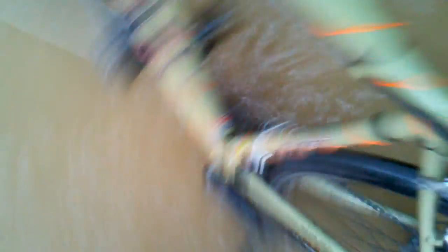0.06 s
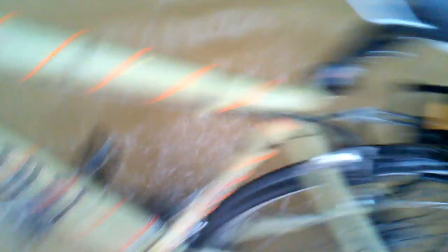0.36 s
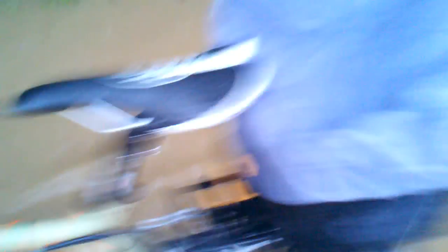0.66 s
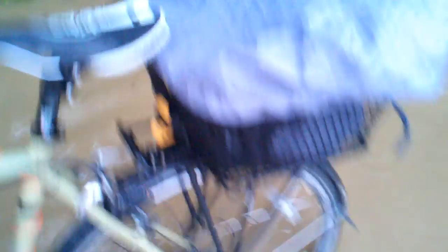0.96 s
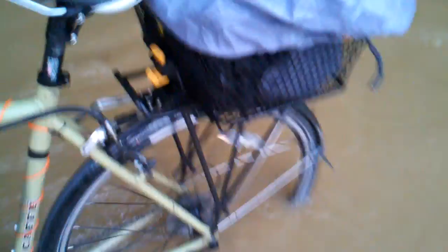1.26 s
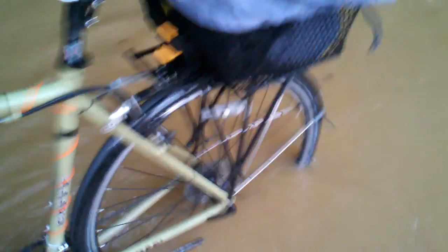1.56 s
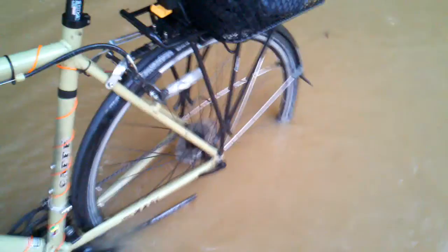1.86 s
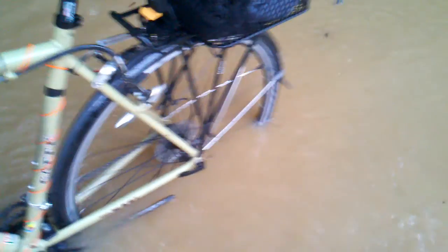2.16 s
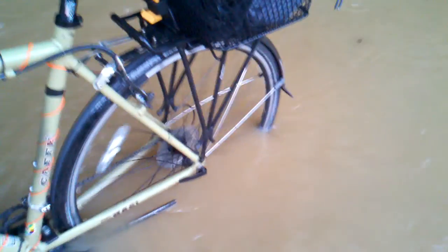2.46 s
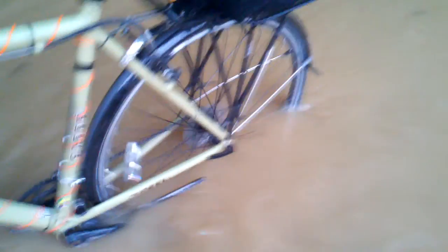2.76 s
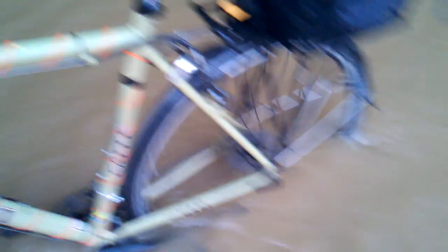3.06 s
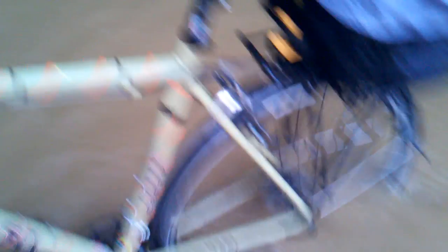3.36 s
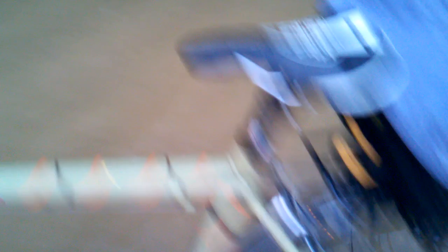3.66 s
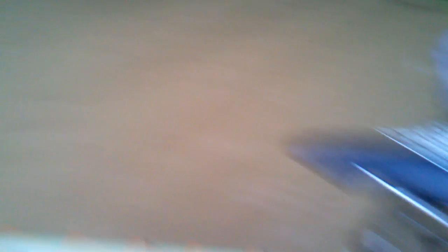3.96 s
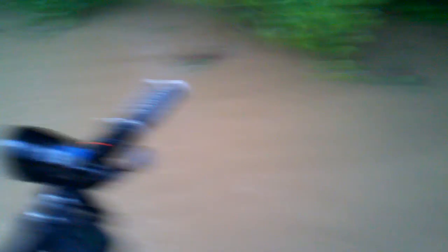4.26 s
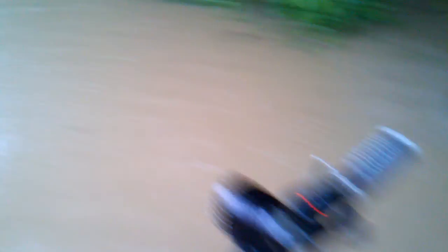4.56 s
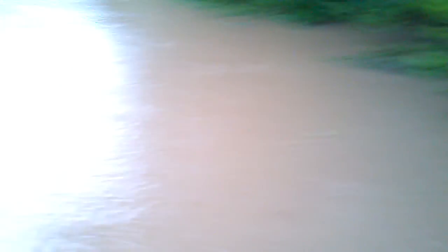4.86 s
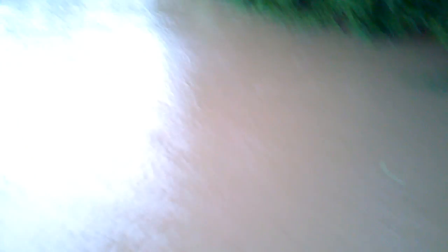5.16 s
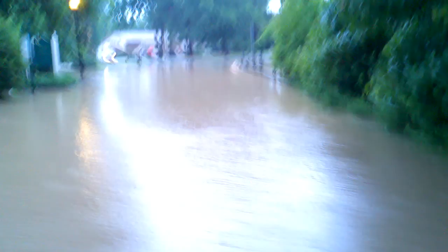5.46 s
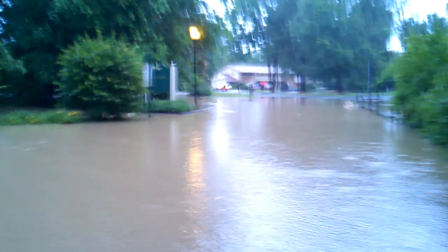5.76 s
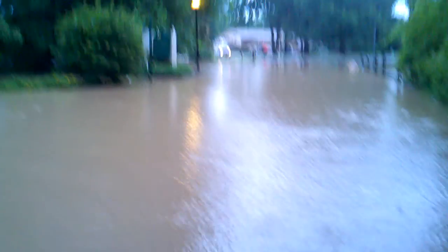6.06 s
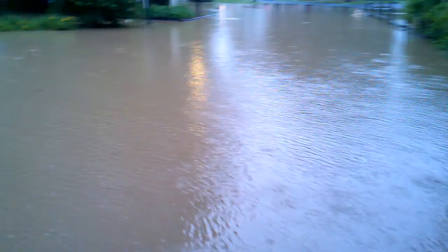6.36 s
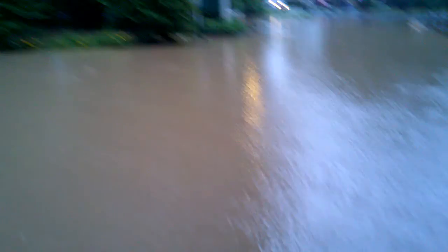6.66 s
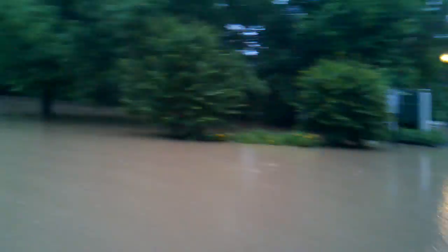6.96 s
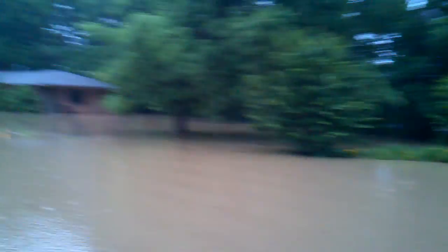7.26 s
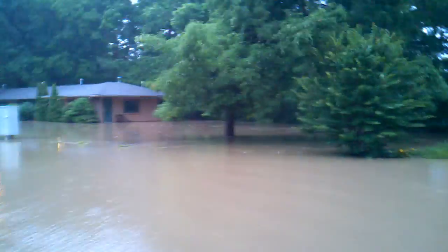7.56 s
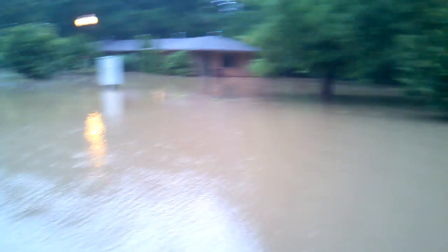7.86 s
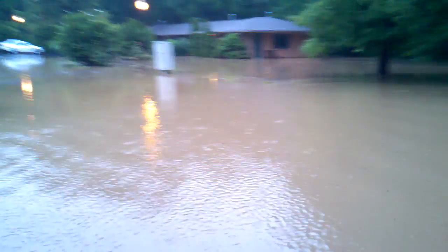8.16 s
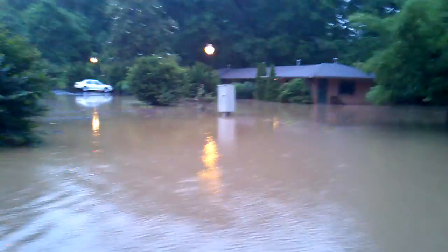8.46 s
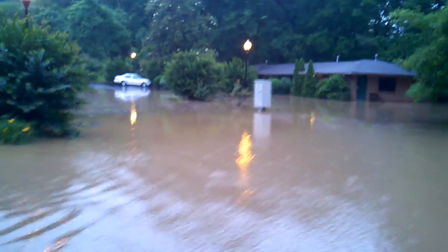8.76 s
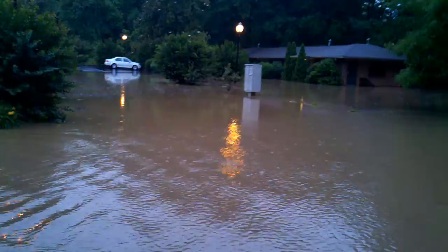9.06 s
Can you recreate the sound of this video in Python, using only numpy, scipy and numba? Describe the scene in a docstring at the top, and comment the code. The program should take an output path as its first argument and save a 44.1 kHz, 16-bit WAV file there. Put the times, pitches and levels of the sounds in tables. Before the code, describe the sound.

Water sloshes and plops around the legs of a person wading through a flooded street, with a light trickle from a bicycle wheel. The strides build into heavier, foamy splashing and gulping gurgles, then settle to gentler laps as distant birds whistle and a faint engine-like hum swells and fades. The flood washes and rumbles quietly throughout, and a few soft bumps touch the close, hand-held stereo microphone.

```python
"""A flooded street, where someone wades beside a bicycle, close to a hand-held stereo microphone.
Each stride pushes up a slosh of ringing bubbles, foam, deep gurgles and spray, biggest midway through.
Single plops, gulping air pockets, ticks and jets of droplets sit on top; water trickles off the wheel.
Behind lie the wash of the flood, a low rumble, a faint engine-like drone and a few far birds.
Soft buffets bump one microphone port, and the two ports are cross-fed to widen the image."""
import sys
import numpy as np
from scipy import signal
from scipy.fft import rfft, irfft, next_fast_len
from scipy.io import wavfile
from scipy.ndimage import uniform_filter1d
from numba import njit

SR = 44100
rng = np.random.default_rng(int(sys.argv[2]) if len(sys.argv) > 2 else 0)


def dump(signal):
    """Clip the signal to [-1, 1] and save it as 16-bit WAV at the path in sys.argv[1]."""
    limited = np.clip(np.atleast_2d(signal).T, -1, 1)
    pcm = np.round(limited * 32767).astype(np.int16)
    wavfile.write(sys.argv[1], SR, pcm)


N = 410122

# Strides through the water. Each row: start, swell and hold in seconds, then slosh, gurgle and spray in dB.
STRIDE_SURGES = [(0, 0.0031, 0.035, -40, -40, -56), (0.235, 0.11, 0.57, -37, -39.5, -47.5),
                 (0.992, 0.048, 0.12, -35, -49, -49), (1.31, 0.051, 0.21, -32.5, -41.5, -42.5),
                 (1.845, 0.16, 0.24, -41.5, -49, -49), (2.897, 0.053, 0.21, -41.5, -56, -51),
                 (3.196, 0.1, 0.23, -43.5, -46.5, -51), (3.59, 0.23, 0.48, -31.5, -38, -41),
                 (3.997, 0.036, 0.2, -28.5, -38, -35.5), (4.308, 0.14, 0.18, -26.5, -34.5, -39.5),
                 (4.541, 0.12, 0.25, -26, -35.5, -33), (4.926, 0.054, 0.48, -25.5, -30.5, -35.5),
                 (5.486, 0.02, 0.61, -27, -32.5, -40), (5.79, 0.096, 0.062, -30, -47, -33.5),
                 (6.336, 0.26, 0.14, -28.5, -32, -41), (7.182, 0.069, 0.24, -35, -38, -47.5),
                 (8.015, 0.2, 0.028, -36, -50, -54.5), (8.36, 0.057, 0.21, -48, -46.5, -58.5)]
# Crests that break. Each row: peak time in seconds, slosh in dB, spray in dB.
CRESTS = [(0.018, -48, -43), (.35, -33.5, -59), (.52, -35, -49), (0.779, -34, -50), (1.26, -27, -40.5),
          (1.42, -43, -47), (1.55, -48, -59), (2.11, -31.5, -58), (2.4, -42, -62), (2.85, -44, -49),
          (2.93, -35, -45.5), (4.027, -26.5, -30.5), (4.649, -25, -30), (4.70, -23.5, -36),
          (5.28, -20.5, -35), (5.335, -37, -32.5), (5.39, -27, -29.5), (5.53, -21.5, -50),
          (5.917, -21, -37), (5.97, -20, -35), (6.15, -28, -45), (6.39, -34.5, -47), (7.5, -48, -44.5),
          (8.26, -34, -53)]
# Air dragged under. Each row: centre time in seconds, length in seconds, level in dB.
TRAPPED_AIR = [(0.752, 0.053, -29), (1.53, 0.033, -24), (2.284, 0.02, -33), (3.088, 0.17, -37.5),
               (4.128, 0.049, -23.5), (4.378, 0.13, -26.5), (5.126, 0.76, -27.5), (5.746, 0.35, -23),
               (5.96, 0.11, -27), (6.41, 0.078, -32.5), (6.743, 0.041, -42), (8.295, 0.16, -37.5)]

# The tone colour of each layer. Each row: frequency in Hz, relative level in dB.
SLOSH_TONE = [(500, 1.5), (750, 5), (1300, 2), (1800, 0), (2300, -10), (2900, -12), (3800, -12.5)]  # midrange bubbles
FOAM_TONE = [(60, -59), (150, -7.5), (300, -6), (600, -8.5), (1400, 2.5), (1900, -1), (2600, -18.5),
             (3600, -32), (6000, -51), (14000, -55)]  # churned froth
GURGLE_TONE = [(170, -20), (230, -6.5), (300, -5), (420, 1), (540, -2.5)]  # big, deep bubbles
SPRAY_TONE = [(1500, -84), (2800, 5), (3800, 0.5), (5000, -1.5), (6500, 0.5), (8000, 3.5), (9500, 1),
              (11000, -2), (14000, -4)]  # fine droplets
FLOOD_TONE = [(30, -37), (100, -31), (250, -1), (450, 3), (700, -4), (1300, -2), (2300, -6.5), (3300, -8),
              (5200, -16), (8000, -12.5), (14000, -18.5)]  # water further off
RUMBLE_TONE = [(20, -4), (45, -27), (75, -8), (110, -1.5), (135, 4.5), (170, 2), (260, 2.5), (600, -20),
               (2000, -60)]  # the low end of the street

# Fader rides for the distant flood, the rumble and the drone. Each row: time in seconds, gain in dB.
FLOOD_FADER = [(0, -45.5), (4, -45.5), (7.8, -44.5), (8.7, -48), (9.3, -48)]
RUMBLE_FADER = [(0, -49.5), (4, -52.5), (6, -48.5), (7.2, -50), (8.6, -51.5), (9.3, -55.5)]
DRONE_FADER = [(0, -20), (5.8, -4), (6.7, 0.5), (7.3, 0), (8.4, -15), (9.3, -22.5)]
# The tones of the far drone. Each row: pitch in Hz, level before the fader in dB.
DRONE_TONES = [(109, -53), (167, -54.5), (219, -54), (276, -67)]

# Sharp ticks of spatter. Each row: start in seconds, level in dB, pitch in Hz, decay in seconds.
DROP_TICKS = [(.055, -22.5, 7640, 0.0033), (0.271, -26.5, 5000, 0.0036), (0.6462, -14.5, 9300, 0.001),
              (1.1343, -23, 5470, 0.0044), (1.2266, -20, 9100, 0.005), (1.502, -17, 11500, 0.00042),
              (1.512, -25, 11500, 0.0005), (1.659, -21, 3900, .003), (1.988, -24.5, 9100, 0.006),
              (2.229, -18, 4200, 0.0034), (2.273, -27, 4500, 0.0015), (2.428, -27.5, 8600, .002),
              (2.6807, -29, 4240, 0.002), (2.9168, -27, 6960, .002), (4.0238, -21, 3700, 0.0022),
              (4.3425, -17, 11000, 0.00062), (4.832, -13, 9100, 0.0026), (5.3652, -14.5, 9300, 0.0027),
              (7.225, -20.5, 3100, 0.0021), (8.492, -31, 5030, 0.0029)]
# Single plops. Each row: start in seconds, level in dB, pitch in Hz, swell in cycles, slap trim in dB.
PLOP_HITS = [(0.242, -18.5, 1220, 1.9, -9), (0.268, -21.5, 388, 1.9, -6), (0.364, -18, 1250, 2.4, -16),
             (.388, -26, 1500, 1.5, -8), (.527, -25.5, 1016, 4.5, -14), (.657, -17, 795, 0.99, -5),
             (.76, -24, 660, 3.2, -18), (0.785, -25, 1460, 4.8, -16), (.875, -21, 350, .5, -28),
             (1.016, -20, 1400, 2.2, -4), (1.029, -22, 1150, 3.5, -2.5), (1.098, -20, 1450, 2, -12),
             (1.127, -21.5, 1440, 3.5, -14), (1.155, -18, 770, 1.1, -18), (1.2, -20, 1500, 3.2, -2),
             (1.232, -14.5, 310, 1.07, -5), (1.315, -14.5, 880, 1.5, -19), (1.5123, -13.5, 283, 0.64, -18),
             (1.5135, -15, 617, 1.2, -12), (1.529, -17, 1540, 7, -6), (1.536, -16.5, 1260, 2, -10),
             (2.008, -24, 1450, 4.6, -14), (2.116, -23, 794, 2, -18), (2.2277, -26, 1200, 1.8, -10),
             (2.276, -24, 507, 1, -13), (2.753, -30.5, 1850, 2, -14), (2.849, -20.5, 1570, 2.2, -23),
             (2.859, -20, 1700, 4.9, -26), (2.9154, -13.5, 1120, 1.1, -20),
             (2.9252, -14.5, 680, 0.75, -3.5), (3.005, -27, 1140, 2.5, -10), (3.143, -26, 1610, 3.1, -9),
             (3.367, -32.5, 680, 2.8, -14), (3.392, -27, 1700, 2, -12), (3.432, -23.5, 1250, 7.2, -2),
             (3.52, -23, 1810, 3, -6), (3.562, -28, 1600, 5.7, -14), (3.63, -27.5, 1160, 4.5, -2),
             (3.7185, -20.5, 700, .8, -9), (4.023, -11, 1310, 0.99, -6), (4.0283, -13.5, 900, 1.1, 0),
             (4.193, -10, 1510, 2.8, -4), (4.229, -3, 986, 1.2, -24), (4.347, -13, 360, 1, -21),
             (4.642, -11, 1830, 3.7, -11), (4.654, -11, 1750, 4.5, -17), (4.704, -10, 706, 2, -12),
             (4.7378, -8, 1630, 1.9, -17), (4.7413, -3.5, 1280, 0.5, -18), (4.834, -14, 1310, 2.8, -6),
             (5.259, -13.5, 570, 2.1, -12), (5.299, -12, 867, 3.7, -11), (5.334, -13.5, 1280, 2.6, -8),
             (5.388, -13, 1340, 2.4, -13), (5.51, -15, 1230, 3.5, -12), (5.5283, -7.5, 1070, 1.7, -10),
             (5.55, -9, 1320, 3.2, -14), (5.831, -22, 380, 0.72, 5), (5.8538, -10, 960, 0.96, -10),
             (6.418, -26, 443, 0.76, -1), (6.427, -18, 1120, 2.6, -9), (6.721, -19, 402, 1.8, -6),
             (6.836, -16.5, 500, 0.96, -1), (6.976, -21.5, 1290, 1.2, -7), (7.109, -19.5, 1030, 2.6, -11),
             (7.2717, -18.5, 930, 2.2, -15), (7.29, -16.5, 470, 1.5, -18), (7.452, -21, 537, 1.3, -12),
             (7.536, -16.5, 638, 2.4, -7), (7.684, -28, 325, 1.2, -18), (8.22, -19, 1260, 3.2, -11),
             (8.3392, -18, 673, 1.1, -12)]
# Jets of fine droplets. Each row: centre time in seconds, length in seconds, level in dB, pitch in Hz.
DROPLET_JETS = [(0.51, .025, -42, 7550), (0.718, 0.059, -35, 8400), (0.795, .05, -38, 8600),
                (0.813, 0.031, -34, 10700), (1.445, 0.053, -33, 12500), (1.591, 0.034, -38, 8500),
                (1.67, 0.026, -41, 7800), (2.159, 0.026, -35, 6900), (2.274, 0.022, -44, 7500),
                (2.36, .016, -51, 6200), (2.697, .012, -52, 7500), (2.95, .03, -45, 7940),
                (3.292, 0.035, -47, 6960)]
# Soft bumps on one port. Each row: start in seconds, level in dB, length in seconds.
PORT_BUFFETS = [(.74, -40, 0.079), (2.37, -49, 0.04), (3.17, -44, 0.034), (4.12, -46, 0.22),
                (4.86, -51, .04)]
# Air pockets closing. Each row: start and length in seconds, level in dB, first and last pitch in Hz.
GULP_GLIDES = [(0.822, 0.081, -25.5, 230.7, 590), (0.87, 0.051, -33, 568, 466),
               (0.893, 0.057, -37, 750, 1110), (1.235, .062, -31, 411, 475), (1.544, 0.029, -32, 845, 1750),
               (4.479, 0.032, -25, 304, 332), (4.521, 0.038, -24, 298, 360), (5.053, 0.034, -24, 289, 350),
               (5.139, 0.033, -24, 298, 363), (5.589, 0.032, -21.5, 253, 336), (5.7, 0.027, -23, 418, 762),
               (5.726, 0.068, -30, 448, 420), (7.237, 0.031, -35, 630, 860),
               (7.553, 0.031, -30.5, 1180, 1450)]
# Far birds. Each row: start and length in seconds, first and last pitch in Hz, level in dB.
BIRD_CALLS = [(1.69, 0.23, 3590, 3540, -47), (2.836, 0.2, 3540, 3590, -47.5),
              (6.352, 0.038, 2200, 2370, -40), (6.425, 0.12, 2400, 2360, -42),
              (6.857, 0.11, 3560, 3430, -38), (6.929, 0.062, 2990, 3050, -35),
              (7.066, 0.041, 2480, 2090, -40), (7.165, 0.09, 2520, 2350, -35.5),
              (7.333, 0.15, 3380, 3290, -46), (7.924, 0.1, 2160, 2080, -49), (8.313, 0.16, 3440, 3070, -48)]

# The hand shading the microphone. Each row: frequency in Hz, left port over right port in dB.
HAND_SHADE = [(100, -3), (300, 1.4), (600, 0.8), (1300, 0.5), (2000, -10.5), (2500, -12.5), (3300, -4),
              (4700, 0.5), (6500, -0.5), (14000, -0.3)]
# Cross-feed between the ports. Each row: frequency in Hz, share of the other port to subtract.
CROSS_FEED_SHARE = [(100, 0.88), (2600, 1), (4100, 0.61), (5200, 0.35), (8000, 0.2), (14000, 0.082)]
# Extra width in the upper mids. Each row: frequency in Hz, boost to the side signal in dB.
SIDE_BOOST = [(1300, 0), (1750, 3), (2300, 4), (3000, 0)]

TIME = np.arange(N) / SR
CONTROL_TIME = np.arange(N * 1000 // SR + 1) / 1000  # seconds, in millisecond steps for envelopes


def amp(db):
    """Decibels to gain."""
    return 10 ** (np.asarray(db) / 20)


def unit_rms(x):
    """Scales a signal to rms 1."""
    return x / np.sqrt(np.mean(x ** 2) + 1e-20)


def curve_at(curve, hz):
    """Reads a curve along a log-frequency axis."""
    knots_hz, values = np.transpose(curve)
    return np.interp(np.log(hz + 1), np.log(knots_hz + 1), values)


def fader(ride):
    """Turns a fader ride into a gain for every sample."""
    times, db = np.transpose(ride)
    return amp(np.interp(TIME, times, db))


def add(mix, start, sound):
    """Lays a sound into both ports, start seconds in."""
    part = mix[:, max(round(start * SR), 0):][:, :sound.shape[-1]]
    part += sound[..., :part.shape[1]]


def wash(tone, patchy_db, apart_hz):
    """Noise in flickering patches, narrow in the bass and opening out towards apart_hz."""
    hz = np.fft.rfftfreq(1024, 1 / SR)
    mid_re, mid_im, side_re, side_im, patches = rng.standard_normal((5, N // 256 + 5, len(hz)))
    patches = uniform_filter1d(patches, size=4, axis=0)  # smear over time
    patches = unit_rms(uniform_filter1d(patches, size=60, axis=1))  # and over frequency
    mid = mid_re + 1j * mid_im
    side = (side_re + 1j * side_im) * np.clip(hz / apart_hz, 0.14, 1)
    frames = np.array([mid + side, mid - side]) * amp(curve_at(tone, hz) + patchy_db * patches)
    _, noise = signal.istft(frames.transpose(0, 2, 1), nperseg=1024, noverlap=768)
    return unit_rms(noise[:, :N])


@njit
def ring(start, size, hz, swell, lag, rise):
    """Each bubble swells, dies away and rises in pitch, reaching the right port lag seconds later."""
    out = np.zeros((2, N))
    for k in range(len(start)):
        first = int(start[k] * SR)
        for i in range(max(-first, 0), min(int(8 * swell[k] * SR), N - first)):
            t = i / SR
            age = t / swell[k]
            envelope = size[k] * age * np.exp(1 - age)
            turns = hz[k] * t * (1 + rise * age)
            out[0, first + i] += envelope * np.sin(2 * np.pi * turns)
            out[1, first + i] += envelope * np.sin(2 * np.pi * (turns - hz[k] * lag[k]))
    return out


def bubbles(start, size, hz, cycles, rise, lag_ms=0.036, scatter_ms=0.089):
    """Bubbles scattered over the water, a little to the left; cycles sets how long each swells."""
    lag = (lag_ms + scatter_ms * rng.standard_normal(len(start))) / 1000
    swell = np.clip(cycles, 0.3, 12) / hz
    return ring(start, size, hz, swell, lag, rise)


def cloud(tone, count, cycles, spread_db, rise):
    """A steady cloud of bubbles, loud and soft, their pitches spread evenly over the octaves."""
    when, pitch, rank, sustain = rng.random((count, 4)).T
    low_hz, high_hz = tone[0][0], tone[-1][0]
    hz = low_hz * (high_hz / low_hz) ** pitch
    size = hz * amp(curve_at(tone, hz) - spread_db * np.log(rank + 0.045))
    return unit_rms(bubbles(when * N / SR, size, hz, cycles * (0.5 + sustain), rise))


def surge(start, swell, hold, fall_db_per_s):
    """An envelope that swells, holds and dies away: a gain for every millisecond."""
    t = CONTROL_TIME - start
    attack = np.clip(t / max(swell, 0.002), 0, 1)
    return attack * amp(-fall_db_per_s * np.maximum(t - swell - hold, 0))


def churning(wake_db=-9, hang_db=-8, spray_build_db=2.5):
    """How hard strides, crests and trapped air drive the slosh, gurgle and spray; their powers add."""
    slosh, gurgle, spray = np.zeros((3, len(CONTROL_TIME)))
    for start, swell, hold, slosh_db, gurgle_db, spray_db in STRIDE_SURGES:
        drive = surge(start, swell, hold, fall_db_per_s=62.5)
        wake = surge(start, swell, hold, fall_db_per_s=29)
        push = np.maximum(drive, amp(wake_db) * wake)  # the wake laps on more softly
        throw = np.maximum(drive, amp(hang_db) * wake)  # the last of the spray falls back
        progress = np.clip((CONTROL_TIME - start) / (swell + hold), 0, 1)
        build_db = -spray_build_db * (1 - progress)  # spray grows as the leg drives on
        slosh += (push * amp(slosh_db)) ** 2
        gurgle += (push * amp(gurgle_db)) ** 2
        spray += (throw * amp(spray_db + build_db)) ** 2
    rise_s = 0.026
    for peak, slosh_db, spray_db in CRESTS:
        crest = surge(peak - rise_s, rise_s, hold=0.0053, fall_db_per_s=201)
        slosh += (crest * amp(slosh_db)) ** 2
        spray += (crest * amp(spray_db)) ** 2
    for centre, length, db in TRAPPED_AIR:
        hump = np.exp(-(2 * (CONTROL_TIME - centre) / length) ** 2)
        gurgle += (hump * amp(db)) ** 2
    return [np.interp(TIME, CONTROL_TIME, np.sqrt(power + 1e-12)) for power in (slosh, gurgle, spray)]


def lapping(depth_db, count=260):
    """Wavelets make the churn come and go at random: a gain for every sample."""
    wavelets = rng.uniform(-1.66, 1, count)
    return amp(depth_db * np.interp(np.arange(N), np.linspace(0, N, count), wavelets))


def spatter(per_s=40, decay_s=0.0012, height=0.38):
    """Falling drops: a gain that jumps at each landing and settles back."""
    chance, size = rng.random((2, N))
    landings = (chance < per_s / SR) * height * (0.084 + size ** 2)
    tails = signal.lfilter([1], [1, -np.exp(-1 / (decay_s * SR))], landings)
    return unit_rms(1 + tails)


def wading():
    """Legs churn the water: short and long-ringing bubbles over a blur of foam, with falling spray."""
    push, depth, throw = churning()
    push = push * lapping(depth_db=1.9)
    crowding = (push / amp(-37.5)) ** 0.17  # a harder push gives more foam and less distinct bubbles
    slosh = amp(-2.5) * cloud(SLOSH_TONE, count=9000, cycles=1.27, spread_db=1.0, rise=0.0084)
    chirps = amp(-6) * cloud(SLOSH_TONE, count=520, cycles=5.05, spread_db=1.0, rise=0.0173)
    foam = amp(-8) * wash(FOAM_TONE, patchy_db=1.5, apart_hz=1860)
    gurgle = amp(-5.5) * cloud(GURGLE_TONE, count=3600, cycles=1.92, spread_db=0.5, rise=0.018)
    droplets = amp(-9.5) * cloud(SPRAY_TONE, count=30000, cycles=2.3, spread_db=6.5, rise=0.0091)
    sparkle = amp(-15) * cloud(SPRAY_TONE, count=500, cycles=3.2, spread_db=2.0, rise=0.0081)
    mist = amp(4.5) * wash(SPRAY_TONE, patchy_db=2.5, apart_hz=2800) * spatter()
    body = (slosh + chirps) / crowding + foam * crowding
    return push * body + depth * gurgle + throw * (droplets + sparkle + mist)


def surroundings():
    """The bed: an even wash of floodwater further off, over a low rumble."""
    flood = fader(FLOOD_FADER) * wash(FLOOD_TONE, patchy_db=2.0, apart_hz=1160)
    rumble = fader(RUMBLE_FADER) * wash(RUMBLE_TONE, patchy_db=0.0, apart_hz=1400)
    return flood + rumble


def drone(waver=0.01312):
    """A faint far hum, like an engine: low tones, each wavering a little in pitch."""
    out = np.zeros(N)
    for hz, db in DRONE_TONES:
        drift = np.interp(np.arange(N), np.linspace(0, N, 30), rng.standard_normal(30))
        out += amp(db) * np.sin(2 * np.pi * hz * np.cumsum(1 + waver * drift) / SR)
    return fader(DRONE_FADER) * out


def ticks(plink_db=-12):
    """Large drops land: a short, broad crack, then the plink of a tiny bubble."""
    cracks, t = np.zeros((2, N)), np.arange(2048) / SR
    for start, db, hz, decay in DROP_TICKS:
        band = signal.butter(1, [hz / 1.5, hz * 1.31], "bandpass", fs=SR, output="sos")
        burst = rng.standard_normal((2, len(t))) * np.exp(-t / decay)
        add(cracks, start, amp(db) * signal.sosfilt(band, burst))
    start, db, hz, _ = np.transpose(DROP_TICKS)
    return cracks + bubbles(start + 0.001, amp(db + plink_db), hz, cycles=3.5, rise=0.0035)


def trickle(level_db=-58):
    """Droplets run off the tyre and spokes while the wheel is close; a few fall as larger drips."""
    nearness = np.interp(TIME, CONTROL_TIME, surge(start=0.15, swell=0.031, hold=3.9, fall_db_per_s=10))
    droplets = cloud(SPRAY_TONE, count=2600, cycles=3.7, spread_db=-8.0, rise=0.0066)
    hiss = amp(6) * wash(SPRAY_TONE, patchy_db=7.0, apart_hz=2920)
    drips = hiss * spatter(per_s=37, decay_s=0.0027, height=5.4)
    return amp(level_db) * nearness * (droplets + drips)


def plops(slap_hz=1300.0, shed_count=10, shed_s=0.0078, shed_db=-20.5):
    """Each plop opens with a slap, rings as one large bubble and sheds small ones."""
    start, db, hz, cycles, slap_db = np.transpose(PLOP_HITS)
    closing = start + 0.002535  # the air pocket closes just after the surface breaks
    body = bubbles(closing, amp(db - 6), hz, cycles, rise=0.0059, scatter_ms=0.054)
    slap_pitch = np.full(len(start), slap_hz)
    slap = bubbles(closing, amp(db + slap_db), slap_pitch, cycles=0.67, rise=0.0, scatter_ms=0.048)
    earliness, pitch = rng.random((len(start), 2, shed_count)).transpose(1, 0, 2)
    shed_start = closing[:, None] - shed_s * np.log(earliness + 0.0062)
    shed_size = amp(db + shed_db)[:, None] * np.sqrt(earliness)
    shed_hz = 450 + 1800 * pitch
    shed = bubbles(shed_start.ravel(), shed_size.ravel(), shed_hz.ravel(), cycles=1.0, rise=0.0057)
    return body + slap + shed


def jets(count=60, spread_octaves=0.18, drop_db=-2):
    """Each jet lands as a quick patter of like-sized droplets."""
    centre, length, db, centre_hz = np.transpose(DROPLET_JETS)[:, :, None]
    when, pitch, strength = rng.standard_normal((len(DROPLET_JETS), 3, count)).transpose(1, 0, 2)
    start = centre + length * when / 4
    size = amp(db + drop_db) * strength
    hz = centre_hz * 2 ** (spread_octaves * pitch)
    return bubbles(start.ravel(), size.ravel(), hz.ravel(), cycles=3.0, rise=0.005)


def buffets():
    """Dull puffs that hit the right port only."""
    out = np.zeros((2, N))
    dull = signal.butter(2, [90, 220], "bandpass", fs=SR, output="sos")
    for start, db, length in PORT_BUFFETS:
        noise = signal.sosfilt(dull, rng.standard_normal(SR))[-round(length * SR):]
        puff = amp(db) * unit_rms(noise) * np.hanning(len(noise))
        add(out, start, np.outer([0, 1], puff))
    return out


def gulps(bend=1.43, skew=0.88, wobble=0.11):
    """An air pocket sings and wobbles as it closes; its note glides faster towards the end."""
    out = np.zeros((2, N))
    for start, length, db, first_hz, last_hz in GULP_GLIDES:
        shake = unit_rms(uniform_filter1d(rng.standard_normal(SR // 4), size=150))
        progress = np.linspace(0, 1, round(length * SR))
        glide_hz = first_hz * (last_hz / first_hz) ** (progress ** bend)
        hz = glide_hz * (1 + wobble * shake[:len(progress)])
        envelope = amp(db) * np.sin(np.pi * progress ** skew) ** 2
        add(out, start, envelope * np.sin(2 * np.pi * np.cumsum(hz) / SR))
    return out


def birds(reverb_s=0.73, flutter_hz=30, flutter_s=0.1, direct_db=-3.0, echo_db=-4.5):
    """Thin whistles slide and settle on their last note, echoing among the trees."""
    calls, t = np.zeros((2, N)), np.arange(SR // 2) / SR
    for start, length, first_hz, last_hz, db in BIRD_CALLS:
        depth_hz = flutter_hz * (length / flutter_s) ** 2  # longer calls flutter more
        flutter = depth_hz * unit_rms(uniform_filter1d(rng.standard_normal(SR), size=130))
        slide = np.linspace(1, 0, round(length * SR)) ** 2
        hz = last_hz + (first_hz - last_hz) * slide + flutter[:len(slide)]
        envelope = amp(db) * np.sin(np.pi * slide ** 0.5)
        add(calls, start, envelope * np.sin(2 * np.pi * np.cumsum(hz) / SR))
    tail = rng.standard_normal((2, len(t))) * amp(-60 * t / reverb_s)
    tail /= np.linalg.norm(tail[0])
    echoes = signal.fftconvolve(calls, tail, axes=1)[:, :N]
    return amp(direct_db) * calls + amp(echo_db) * echoes


def scene():
    """The mix at the two ports: close water in front, the street behind."""
    close_water = wading() + trickle() + plops() + gulps() + ticks() + jets()
    return close_water + buffets() + birds() + drone() + surroundings()


def record(dry, port_delay_s=1 / 2630, bass_cut_hz=80, treble_cut_hz=14050):
    """The hand-shaded microphone: each port loses a delayed copy of the other, widening and combing."""
    size = next_fast_len(N + 4096)
    hz = np.fft.rfftfreq(size, 1 / SR)
    ports = rfft(dry, size) * amp(np.outer([0.5, -0.5], curve_at(HAND_SHADE, hz)))
    share = np.clip(curve_at(CROSS_FEED_SHARE, hz), 0, 0.98)
    phase = 2 * np.pi * hz * port_delay_s
    combed = ports - share * np.exp(-1j * phase) * ports[::-1]
    combed /= 1 - share * np.exp(-1j * np.minimum(phase, np.pi))  # levels the low end
    mid = combed.mean(axis=0)
    wide = mid + (combed - mid) * amp(curve_at(SIDE_BOOST, hz))
    high_pass = signal.butter(2, bass_cut_hz, "highpass", fs=SR, output="sos")
    low_pass = signal.firwin(511, treble_cut_hz, window=("kaiser", 9), fs=SR)
    sound = signal.sosfilt(high_pass, irfft(wide, size)[:, :N])
    return signal.oaconvolve(sound, low_pass[None], "same")


dry = scene()
out = record(dry)
dump(out)
```